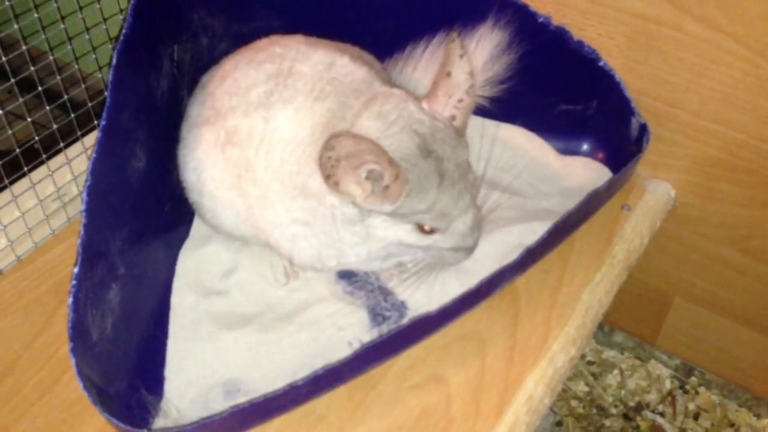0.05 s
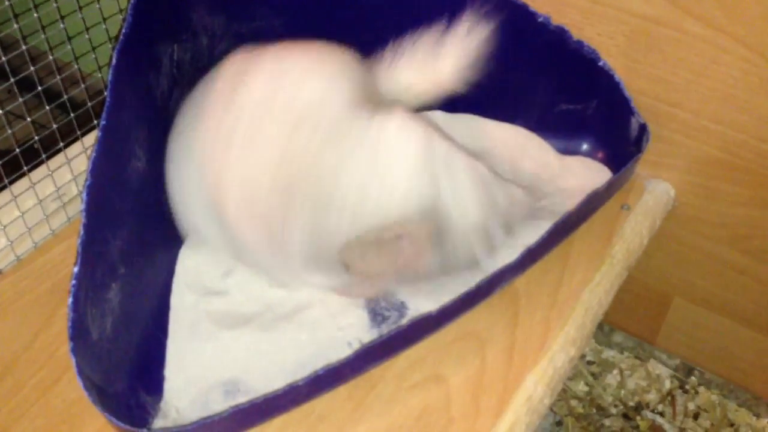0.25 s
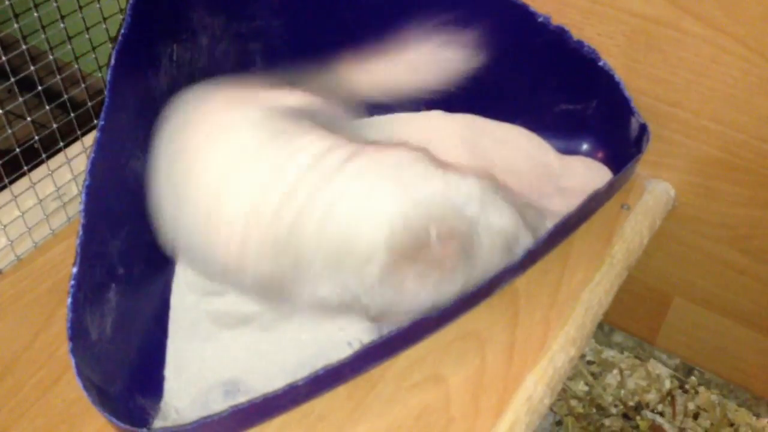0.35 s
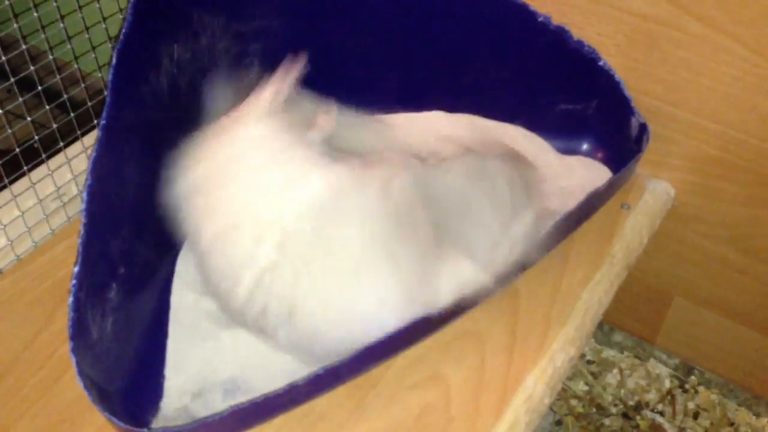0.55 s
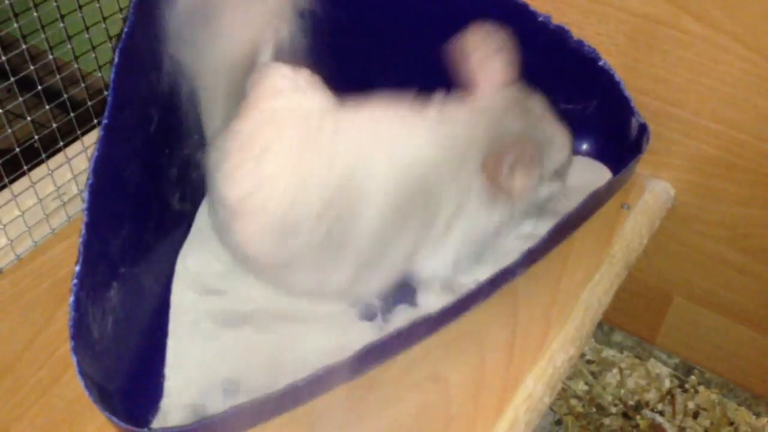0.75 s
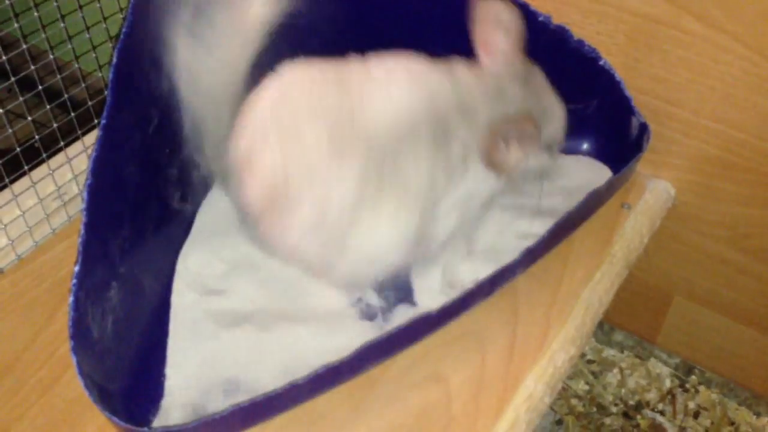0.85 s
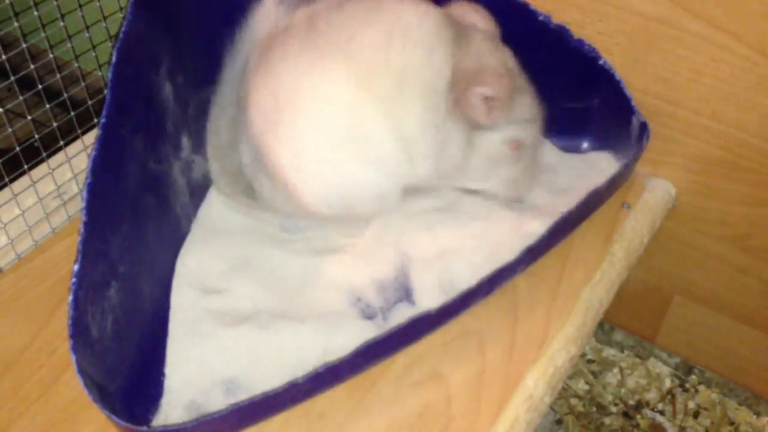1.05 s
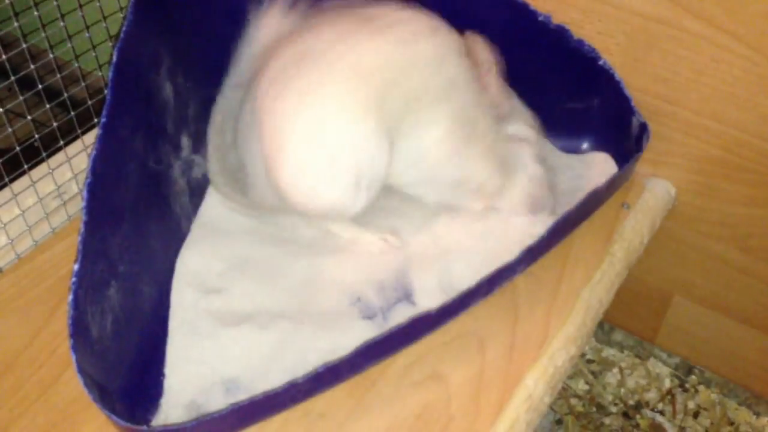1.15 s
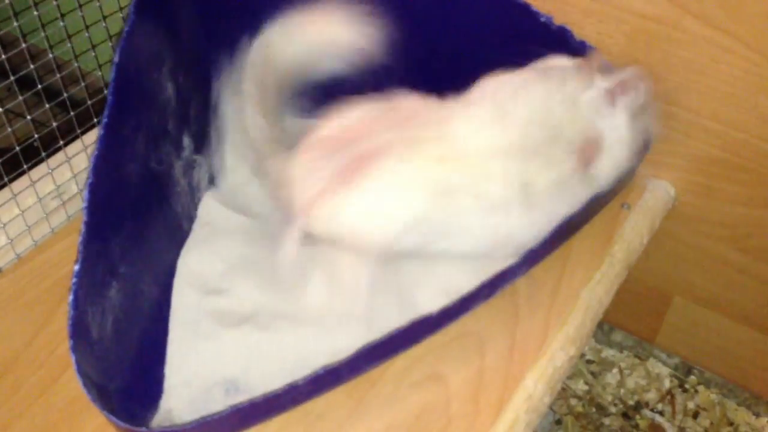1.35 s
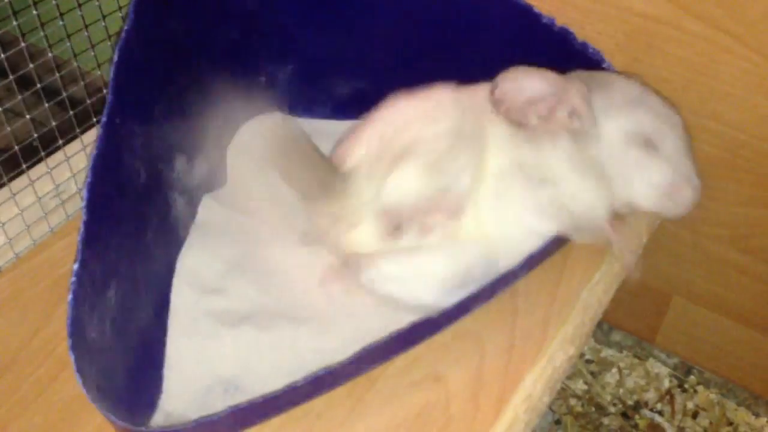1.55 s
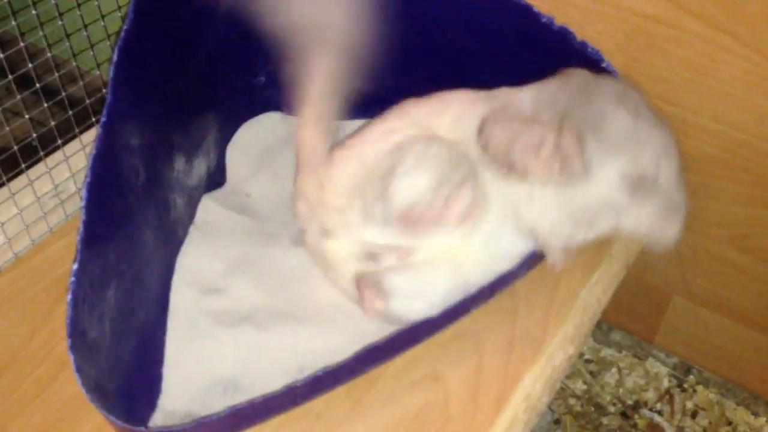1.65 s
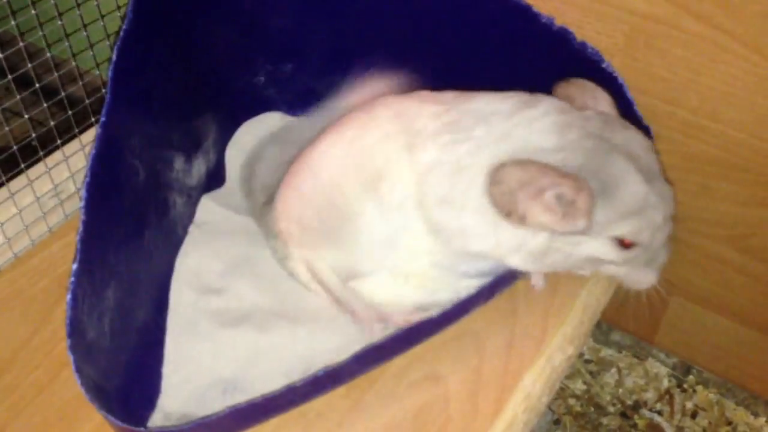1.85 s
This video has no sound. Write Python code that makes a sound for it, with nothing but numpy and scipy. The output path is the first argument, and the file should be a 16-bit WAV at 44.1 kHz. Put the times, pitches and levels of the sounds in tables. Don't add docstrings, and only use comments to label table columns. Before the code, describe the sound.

A chinchilla rolls in fine dust in a plastic tub, scuffing grit and thumping the walls

```python
import sys
import numpy as np
from scipy import signal
from scipy.fft import rfft, irfft, next_fast_len
from scipy.io import wavfile
from scipy.ndimage import uniform_filter1d, map_coordinates

SR = 44100
rng = np.random.default_rng(int(sys.argv[2]) if len(sys.argv) > 2 else 0)


def wrap_up_sound(samples):
    columns = np.atleast_2d(samples).T
    tamed = np.clip(columns, -1, 1)
    steps = np.round(tamed * 32767).astype(np.int16)
    wavfile.write(sys.argv[1], SR, steps)


def makeup_ratio(level_db):
    decades = np.asarray(level_db, float) / 20
    return 10 ** decades


N = 83790


def unit(x):
    return x / np.sqrt(np.mean(x ** 2) + 1e-20)


def shape(points):
    f, v = np.transpose(points)
    return lambda hz: makeup_ratio(np.interp(np.log(hz + 1), np.log(f + 1), v))


def peaks(modes):
    def response(f):
        total = 0
        for k, (hz, width, db) in enumerate(modes):
            total = total + (-1) ** k * makeup_ratio(db) * 1j * f * width / (hz * hz - f * f + 1j * f * width)
        return total
    return response


def curve(rows):
    s, v = np.transpose(rows)
    return np.interp(np.arange(N) / SR, s, v)


def wobble(rate):
    return map_coordinates(rng.standard_normal(N // 50), [np.arange(N) * rate / SR])


def filtered(x, response):
    m = next_fast_len(N + SR // 2)
    return irfft(rfft(x, m) * response(np.fft.rfftfreq(m, 1 / SR)), m)[..., :N]


def grit():
    grains_per_s, spread_db, smooth_share, clump_db, patch_db = 7000, 2.0, .7, 1.2, 2.2
    hit = rng.random(N) < grains_per_s / SR
    size = makeup_ratio(spread_db * rng.exponential(size=N))
    grains = unit(hit * rng.standard_normal(N) * size)
    bed = smooth_share * rng.standard_normal(N)
    z = signal.stft((grains + bed) * makeup_ratio(clump_db * wobble(70.7)), nperseg=128)[2]
    patches = uniform_filter1d(rng.standard_normal(z.shape), size=3, axis=0)
    patches = uniform_filter1d(patches, size=7, axis=1)
    return unit(signal.istft(z * makeup_ratio(patch_db * unit(patches)), nperseg=128)[1][:N])


def room():
    # hz, level_db
    tone_colour = [(15, -71), (25, -39), (106, 4.5), (177, 0), (278, -20.5), (750, -1.5), (955, -10.5),
                   (1060, -9), (15100, -30.5)]
    return makeup_ratio(-70) * unit(filtered(rng.standard_normal(N), shape(tone_colour)))


def cage(x):
    wet_db, tail_s, gap_s = -17, .06, .002
    t = np.arange(SR // 4) / SR
    tail = rng.standard_normal(len(t)) * makeup_ratio(-60 * t / tail_s) * (t > gap_s)
    return makeup_ratio(wet_db) * signal.fftconvolve(x, tail / np.linalg.norm(tail))[:N]


def rumble():
    # hz, level_db
    rumble_colour = [(30, -18), (90, -9.5), (200, 4), (400, -3.5), (900, -14)]
    # time_s, level_db
    weight = [(0.0, -66.5), (0.062, -67), (0.216, -66), (0.358, -66), (0.502, -63), (0.702, -59.5),
              (0.936, -69), (1.052, -64), (1.634, -63.5), (1.9, -64)]
    low = filtered(rng.standard_normal(N), shape(rumble_colour))
    return unit(low * makeup_ratio(2.4 * wobble(29.6))) * makeup_ratio(curve(weight))


def dust_hiss():
    # time_s, effort_db
    rolls = [
        [(.16, -88), (.2, -60), (.3, -50), (.39, -53), (.445, -60), (.535, -60), (.555, -72), (.66, -56),
         (.75, -63)],
        [(.75, -63), (.82, -60), (.9, -54), (.97, -60), (1.0, -54), (1.095, -53), (1.12, -64), (1.15, -67),
         (1.16, -57)],
        [(1.16, -57), (1.187, -60), (1.22, -53), (1.33, -51), (1.42, -52), (1.446, -64), (1.496, -69),
         (1.545, -60), (1.6, -65)],
        [(1.6, -65), (1.7, -66), (1.78, -66), (1.85, -67), (1.9, -65)],
    ]
    # hz, level_db
    dust_colour = [(35, -41), (60, -45), (123, -30), (170, -14), (252, -14), (578, -17), (1210, -10),
                   (2310, -2), (15100, -16)]
    effort = makeup_ratio(-1.13 + curve(sorted(sum(rolls, []))))
    dust = rng.standard_normal(N) + .3 * grit()
    return unit(filtered(dust, shape(dust_colour))) * effort * makeup_ratio(.4 * wobble(22))


def ticks():
    # start_s, peak_db, pitch_hz
    claws = [(.2815, -32, 4000), (.287, -32, 2600), (.3343, -25, 2450), (.3615, -34, 2240),
             (.3968, -33, 2730), (.9105, -33, 3900), (.912, -33, 2300), (1.031, -31, 3800),
             (1.046, -34, 2500), (1.058, -35, 3200), (1.068, -33, 2930), (1.0812, -25, 3700),
             (1.352, -36, 1300), (1.353, -39, 2200), (1.407, -35, 2310), (1.414, -36, 3100),
             (1.863, -47.5, 1700), (.638, -40, 2470), (1.891, -52, 2400), (.193, -52, 1640),
             (1.158, -44, 3110)]
    t60_s, rise_s, gain_db = .005, .0001, 2.5
    out, t = np.zeros(N + SR), np.arange(SR // 3) / SR
    for s, db, hz in claws:
        tone = np.sin(2 * np.pi * hz * t) + 0.15 * np.sin(2 * np.pi * 1.83 * hz * t)
        tone = tone + 0.067 * rng.standard_normal(len(t))
        swell = 1 - np.exp(-t / rise_s)
        start = round(s * SR)
        out[start:start + len(t)] += makeup_ratio(db + gain_db - 60 * t / t60_s) * tone * swell
    return out[:N]


def thumps():
    # start_s, peak_db, pitch_hz, t60_s
    blows = [(.272, -46, 500, 0.07), (.285, -38, 486, 0.06), (.294, -37, 530, 0.07), (.3, -41, 900, .07),
             (0.3983, -27, 500, 0.032), (0.4815, -34, 620, 0.018), (.405, -38, 600, .03),
             (.438, -50, 220, .08), (.44, -50, 650, .025), (.461, -49, 390, 0.07), (.492, -49, 290, .1),
             (0.637, -36, 647, 0.027), (0.665, -44.5, 508, 0.042), (0.854, -55.5, 247, 0.2),
             (0.9105, -34, 780, 0.028), (.9325, -36, 700, 0.018), (.878, -55, 181, .15),
             (0.501, -56.5, 107.2, 0.32), (1.158, -54, 120, 0.22), (1.199, -47, 857, 0.053),
             (1.342, -39, 527, 0.05), (1.351, -25, 651, 0.021), (1.3545, -33, 250, .07),
             (1.352, -40, 155, .08), (1.364, -35, 390, .06), (1.402, -41, 450, 0.025),
             (1.413, -42, 590, 0.03), (1.43, -50, 300, .1), (1.451, -49, 270, .04), (1.522, -40, 318, 0.06),
             (1.538, -47, 270, .1), (1.603, -45.5, 544, 0.03), (1.638, -46, 600, 0.021),
             (1.68, -40, 583, 0.019), (1.71, -52, 457, 0.051), (1.773, -57, 395.5, 0.2),
             (1.824, -47.5, 239, 0.063), (1.844, -56, 442, 0.081), (1.889, -48.5, 1083, 0.042)]
    # pitch_ratio, level_db, t60_factor
    partials = [(1, 0, 1.0), (1.45, -6, .4), (2.05, -9, .4), (.62, -11, 1.1)]
    rise_s, softer, noise_share, first_swing = .0007, .35, .17, .55
    out, t = np.zeros(N + SR), np.arange(SR // 3) / SR
    for s, db, hz, t60 in blows:
        luck = rng.standard_normal((4, 2))
        luck[0] = 0
        ring = np.zeros(len(t))
        for (ratio, level, factor), (louder, sharper) in zip(partials, luck):
            decay = makeup_ratio(level + 0.91 * louder - 60 * t / (t60 * factor))
            ring += decay * np.sin(2 * np.pi * hz * ratio * (1 + 0.014 * sharper) * t)
        band = signal.butter(2, [.5 * hz, 2.36 * hz], 'band', fs=SR, output='sos')
        thud = unit(signal.sosfilt(band, rng.standard_normal(len(t))))
        ring += noise_share * makeup_ratio(-60 * t / t60) * thud
        push = 1 + first_swing * np.exp(-t * hz)
        swell = 1 - np.exp(-t / (rise_s * makeup_ratio(-softer * (db + 28.5))))
        start = round(s * SR)
        out[start:start + len(t)] -= makeup_ratio(db - 3) * ring * push * swell
    return out[:N]


def knocks():
    return filtered(thumps() + ticks(), lambda f: (1j * f / (110 + 1j * f)) ** 3)


def rasps():
    # middle_s, length_s, pitch_hz, level_db
    scrapes = [(.215, .04, 1650, -55), (.228, .012, 1700, -54), (.284, .01, 3300, -41),
               (.3, .035, 2200, -43), (.29, .02, 1680, -49), (.347, .012, 1750, -48),
               (.367, .02, 5400, -50), (.37, .03, 2700, -48), (.912, .01, 1750, -45),
               (1.005, .025, 2900, -51), (1.047, .008, 2400, -46), (1.069, .01, 2750, -46),
               (1.083, .015, 3900, -51), (1.2, .012, 3570, -55), (1.3, .02, 1680, -54),
               (1.365, .015, 2200, -52)]
    q = 7
    t, out = np.arange(N) / SR, np.zeros(N)
    drive = grit()
    for s, length, hz, db in scrapes:
        mode = peaks([(hz, hz / q, 0)])
        sung = unit(filtered(drive, lambda f: mode(f) ** 2))
        swell = np.cos(np.pi * np.clip((t - s) / (2 * length), -.5, .5)) ** 2
        out += makeup_ratio(db) * sung * swell
    return out


def scuffs():
    # peak_s, rise_s per 20 dB, fall_s per 20 dB, level_db, bright_share 0-1
    strokes = [(.207, .03, .12, -50, .5), (.243, .05, .024, -45, .6), (.274, .008, .05, -45, .6),
               (.284, .018, .09, -38, .3), (.308, .05, .16, -39.5, .3), (.335, .03, .06, -44, .3),
               (.362, .025, .1, -41.5, .4), (.397, .005, .04, -44, .5), (.43, .03, .05, -55, .3),
               (.51, .02, .06, -59, .5), (.638, .035, .04, -53, .4), (.675, .04, .12, -55, .5),
               (.865, .04, .12, -51, .5), (.897, .07, .04, -48, .6), (.912, .014, .035, -38.5, .3),
               (.997, .022, .12, -44, .45), (1.032, .008, .04, -39, .8), (1.046, .012, .025, -40, .4),
               (1.058, .008, .015, -42, .7), (1.07, .016, .035, -41, .6), (1.087, .015, .06, -45, .8),
               (1.158, .002, .05, -47, .6), (1.198, .006, .05, -45, .7), (1.3, .12, .1, -46, .4),
               (1.36, .03, .1, -48, .3), (1.4, .06, .04, -46, .5), (1.415, .03, .03, -45.5, .4),
               (1.434, .02, .012, -53, .5), (1.54, .04, .15, -62, .7), (1.644, .03, .03, -64, .5),
               (1.68, .008, .03, -63, .4), (1.778, .006, .04, -60, .4), (1.82, .006, .04, -66, .4),
               (1.893, .012, .03, -57, .2)]
    # pitch_hz, width_hz, level_db
    floor_modes = [(1674, 104, 5.5), (1886, 70, 5), (2222, 160, 3.5), (2547, 146, 0), (2978, 94, -6),
                   (3300, 280, -2), (4000, 1100, -7.5)]
    # pitch_hz, width_hz, level_db
    wall_modes = [(2007, 96, -0.5), (2612, 113, 2), (2794, 49, -1), (2912, 80, 5), (3338, 110, 0),
                  (3800, 100, 1), (4335, 330, -6)]
    # pitch_hz, width_hz, level_db
    low_modes = [
        [(545, 76, -7.5), (972, 76, -4.5)],
        [(362.4, 28.6, -1.5), (207.6, 29, -8)],
    ]
    # hz, level_db
    air_colour = [(150, -57), (500, -24), (1200, -24), (5000, -17), (9000, -22.5), (15500, -38)]
    spray_s, gain_db = .015, -1.33
    t = np.arange(N) / SR
    drive = np.zeros((2, N))
    for s, rise, fall, db, bright in strokes:
        away = np.where(t < s, (s - t) / rise, (t - s) / fall)
        level = makeup_ratio(db + gain_db - 20 * away)
        drive += np.outer([1 - bright, bright], level ** 2)
    thrown = uniform_filter1d(drive[1] + .6 * drive[0], size=int(spray_s * SR))
    spray = np.sqrt(np.abs(thrown))
    out = makeup_ratio(17) * filtered(grit() * spray, shape(air_colour))
    for power, modes, low in zip(drive, (floor_modes, wall_modes), low_modes):
        def body(f):
            return peaks(modes)(f) * f * f / (f * f + 1300 ** 2) + peaks(low)(f)
        norm = np.sqrt(np.mean(np.abs(body(np.linspace(0, SR / 2, num=2000))) ** 2))
        out = out + filtered(grit() * np.sqrt(power), body) / norm
    return out


def scene():
    near = scuffs() + knocks() + rasps()
    return (near + cage(near) + dust_hiss() + rumble() + room())[None]


def band_limit(x):
    return signal.sosfilt(signal.butter(12, 15210, fs=SR, output="sos"), x)


def record(dry):
    heard = filtered(dry, lambda hz: hz < 15215)
    return band_limit(heard)


dry = scene()
out = record(dry)
wrap_up_sound(out)
```